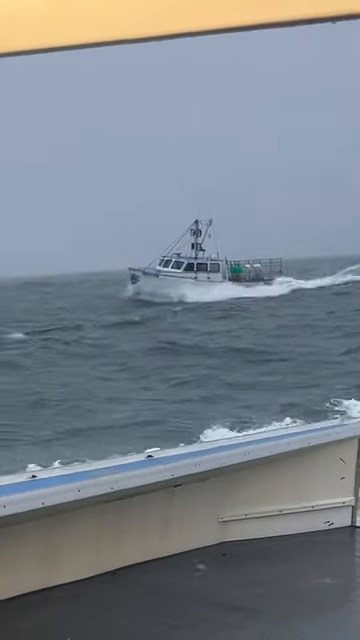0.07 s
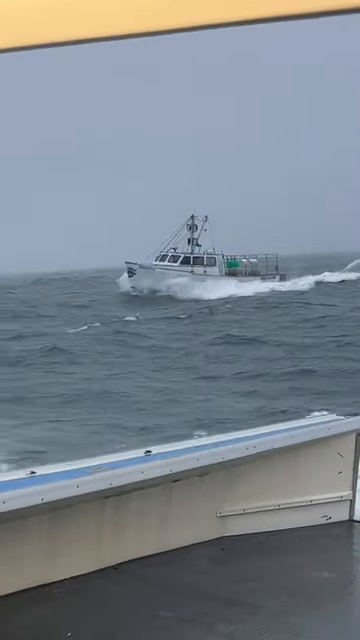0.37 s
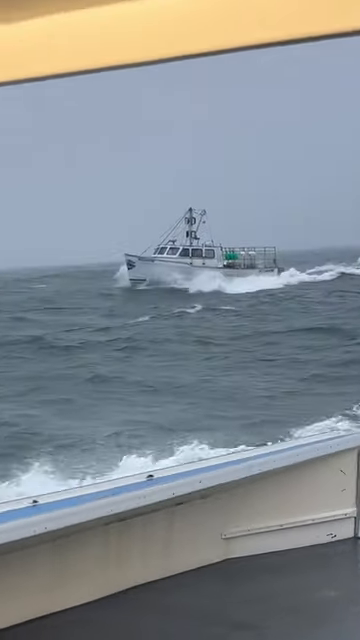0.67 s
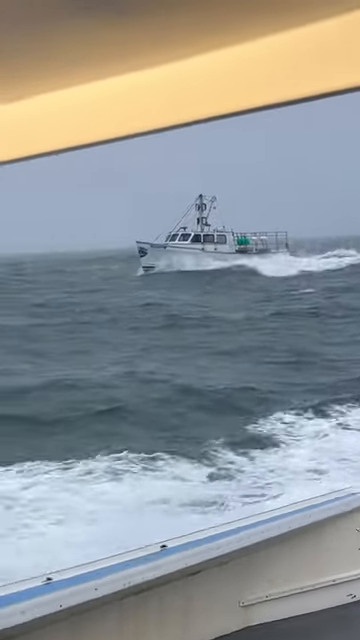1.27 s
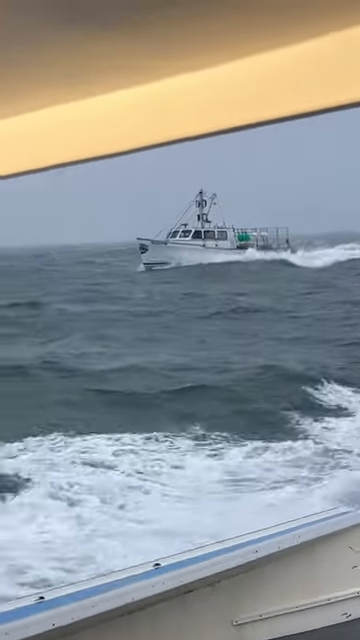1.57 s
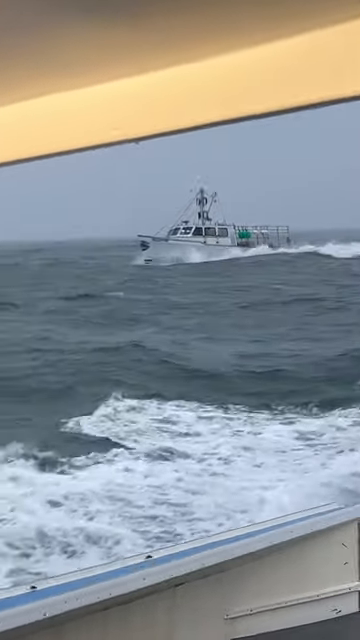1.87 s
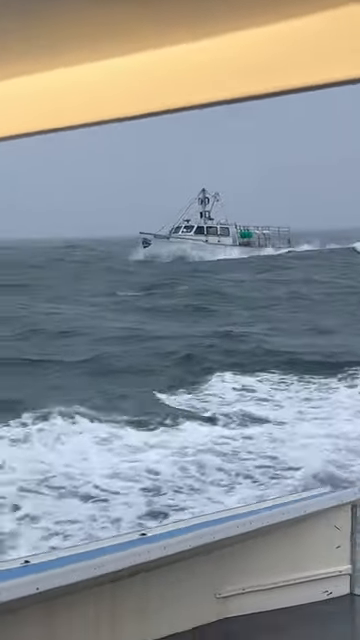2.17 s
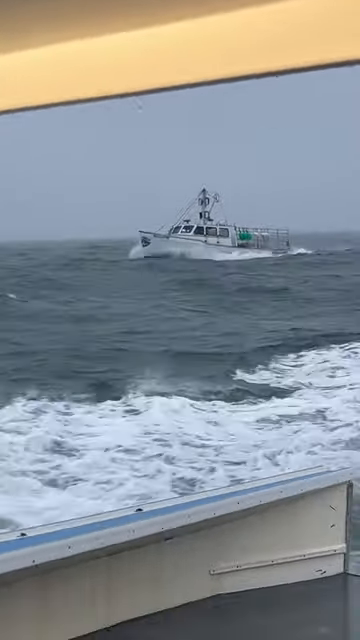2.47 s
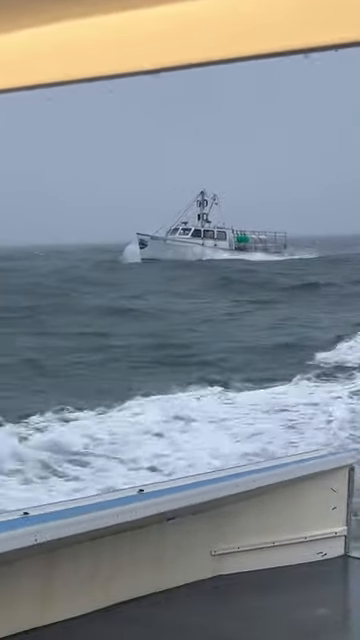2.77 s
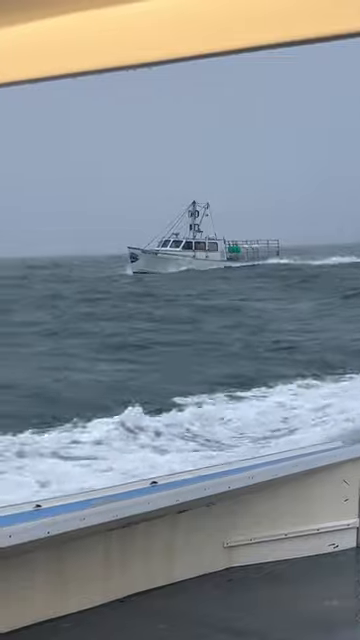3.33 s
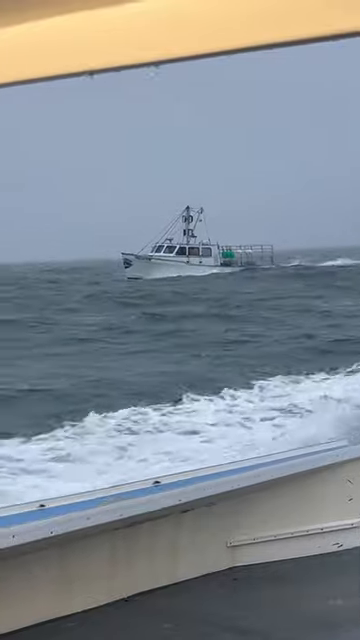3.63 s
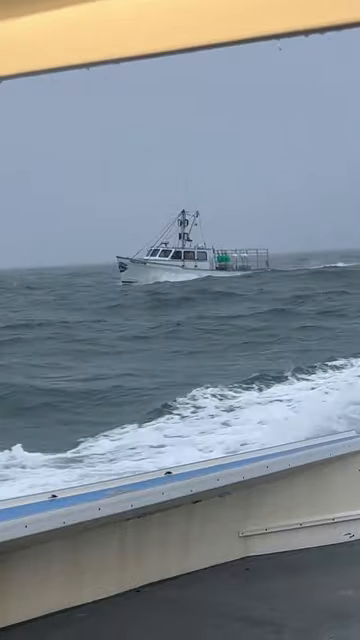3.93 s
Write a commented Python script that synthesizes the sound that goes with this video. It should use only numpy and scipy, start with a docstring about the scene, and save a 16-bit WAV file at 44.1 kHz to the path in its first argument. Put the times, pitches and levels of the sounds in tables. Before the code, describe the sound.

A low, chugging diesel engine holds its speed, close by on the deck of a boat at sea. Churning water swells twice under a spray hiss, bringing a few hull thumps and slaps, with light wind on the microphone.

```python
"""On the open deck of a boat cruising through a choppy sea.
A six-cylinder diesel holds steady revs: its firings make an exhaust drone, with a loping knock,
a buzzing block, combustion clatter and two thin turbo whistles on top. The wake surges along the
hull under a hiss of spray, a few waves thump and slap it, and gusts brush the microphone."""
import sys
import numpy as np
from scipy import signal
from scipy.fft import rfft, irfft
from scipy.io import wavfile
from scipy.ndimage import uniform_filter1d, minimum_filter1d

SR = 44100
rng = np.random.default_rng(int(sys.argv[2]) if len(sys.argv) > 2 else 0)


def transcribe(signal):
    """Save signal, clipped to [-1, 1], as a 16-bit WAV file at the path in sys.argv[1]."""
    frames = np.atleast_2d(signal).T
    limited = np.clip(frames, -1, 1)
    pcm = np.round(limited * 32767).astype(np.int16)
    wavfile.write(sys.argv[1], SR, pcm)


N = 176400
TIME = np.arange(N) / SR
CYCLE_HZ, CYLINDERS = 13.02, 6  # an order is a multiple of the engine's cycle rate

# low harmonics of the exhaust: order, level_db
EXHAUST_ORDERS = [(3, -39), (4, -31), (5, -22), (6, 0), (7, -16), (8, -26), (9, -14.5), (10, -25),
                  (11, -20), (12, -11.5)]
# harmonics that the hull and cabin reinforce: order, level_db
HULL_ORDERS = [(14, -23.5), (15, -21), (18, -32), (21, -27.5), (27, -30.5), (30, -25.5), (39, -31.5),
               (48, -42.5), (52, -34), (56, -41), (94, -44), (107, -45.5)]
# colour of rushing air, also used to widen the wake: freq_hz, level_db
RUSH_SPECTRUM = [(20, -26.5), (45, -10.5), (80, 0), (130, 5), (320, 6.5), (650, 4), (1100, -3), (1600, -19),
                 (2200, -64.5), (4000, -100)]


def amp(db):
    """Decibels to gain."""
    return 10 ** (np.asarray(db) / 20)


def unit(x):
    """Scales to rms 1."""
    return x / np.sqrt(np.mean(x ** 2) + 1e-20)


def curve(points):
    """A control curve at every sample."""
    return np.interp(TIME, *np.transpose(points))


def level_at(spectrum, hz):
    """Reads a spectrum table on a log-frequency axis."""
    freq_hz, level_db = np.transpose(spectrum)
    return np.interp(np.log(hz + 1), np.log(freq_hz + 1), level_db)


def colour(x, spectrum):
    """Filters by a spectrum table and scales to rms 1."""
    return unit(irfft(rfft(x) * amp(level_at(spectrum, np.fft.rfftfreq(N, 1 / SR))), N))


def noise(spectrum):
    """Noise of rms 1 with the given colour."""
    return colour(rng.standard_normal(N), spectrum)


def drift(rate_hz, size=2048):
    """Smooth random motion of rms 1, up to about the given rate."""
    hz = np.fft.rfftfreq(size, N / SR / size)
    slow = irfft(rfft(rng.standard_normal(size)) * np.exp(-.5 * (hz / rate_hz) ** 2) * (hz > 0), size)
    return np.interp(TIME, np.linspace(0, N / SR, size), unit(slow))


def stereo(centre, sides):
    """Left and right from centre and side parts."""
    return np.array([centre + sides, centre - sides])


def quarter_turn(x):
    """Shifts every frequency a quarter cycle, like the difference between two close microphone ports."""
    return irfft(-1j * rfft(x), N)


def add(mix, start_s, sound):
    """Mixes a sound in at its start time."""
    part = mix[max(round(start_s * SR), 0):][:len(sound)]
    part += sound[:len(part)]


def churn(spectrum, lumps_db):
    """Turbulent water or air: every band comes in quick lumps of its own."""
    # borders of the bands that churn independently: edge_hz
    edges = [0, 110, 330, 750, 1600, 20000]
    bins, hz = rfft(noise(spectrum)), np.fft.rfftfreq(N, 1 / SR)
    bands = [irfft(bins * (hz >= lo) * (hz < hi), N) for lo, hi in zip(edges, edges[1:])]
    return unit(sum(band * amp(lumps_db * 2 * np.tanh(drift(rate_hz=62) / 2)) for band in bands))


def partial(order, cycle_angle, waver):
    """One wavering engine harmonic. The exhaust smears the low orders' phases; high ones fall at random."""
    offset = 2 * np.pi * rng.random()
    if order <= EXHAUST_ORDERS[-1][0]:
        offset = 2.4 * (order - CYLINDERS) ** 2  # dispersion around the firing tone
    level = np.sqrt(2) * (1 + waver * drift(rate_hz=16.5))
    return level * np.cos(order * cycle_angle + offset + waver * drift(rate_hz=4.1))


def spray():
    """An even spray hiss, with treble notches and a phasey width from the stereo recorder."""
    # centre spectrum, with the recorder's notch at 5 kHz: freq_hz, level_db
    centre_spectrum = [(20, 17.5), (45, 19.5), (200, 9.5), (1000, 4), (2300, 7.5), (3400, 6), (4000, 1.5),
                       (4800, -0.5), (5000, -13.5), (5250, 0), (8600, 0.5), (9700, -4.5), (11200, -8),
                       (12300, -21.5), (13000, -49.5)]
    # side spectrum, with holes from the recorder's coding and stereo processing: freq_hz, level_db
    side_spectrum = [(2200, -39.5), (4000, -23), (4500, -2.5), (5000, 11.5), (5600, -4.5), (6500, -29),
                     (7700, 0), (9000, 7.5), (9800, 2.5), (11000, 5), (12500, 0), (15700, 0.5)]
    # slow swell of the spray: time_s, gain_db
    swell = [(0, 1.7), (.45, 1), (1.1, -0.7), (1.6, 0.6), (2.1, 1.2), (2.9, -0.4), (4, 0.5)]
    hiss, diffuse = rng.standard_normal((2, N))
    likeness = .75  # how closely the sides follow the centre
    side_hiss = likeness * quarter_turn(hiss) + np.sqrt(1 - likeness ** 2) * diffuse
    centre = amp(-45.5) * colour(hiss, centre_spectrum)
    sides = amp(-55) * colour(side_hiss, side_spectrum)
    return amp(curve(swell)) * stereo(centre, sides)


def wind():
    """Gusts flutter differently at the two sides of the microphone."""
    # airflow over the microphone: time_s, level_db
    gusts = [(0, -38), (.2, -28), (.45, -31), (.62, -43), (.8, -41.5), (1, -34.5), (1.2, -43.5),
             (1.36, -35), (1.52, -46), (1.75, -26), (2.05, -35), (2.22, -42.5), (2.8, -40.5), (3.3, -39.5),
             (4, -46)]
    centre = amp(-13) * churn(RUSH_SPECTRUM, lumps_db=.5)
    sides = amp(-.5) * churn(RUSH_SPECTRUM, lumps_db=.5)
    return amp(curve(gusts)) * stereo(centre, sides)


def wake():
    """Lumpy roar of churning water, swelling as the hull meets the waves."""
    # surge along the hull: time_s, level_db
    surge = [(0, -62), (.5, -32), (1.2, -30.5), (1.4, -20), (1.62, -23), (1.79, -17.5), (1.95, -21.5),
             (2.2, -25), (2.6, -39), (2.9, -26), (3.1, -25), (3.45, -21.5), (3.8, -20), (4, -22.5)]
    # colour of the roar: freq_hz, level_db
    roar = [(15, -27.5), (30, -19.5), (48, 10.5), (110, -3.5), (180, 1), (260, -2.5), (500, -8),
            (800, -18.5), (1300, -28), (2200, -35), (4000, -62.5), (9000, -76), (13000, -100)]
    return amp(curve(surge)) * stereo(churn(roar, lumps_db=4.5), amp(-22) * noise(RUSH_SPECTRUM))


def wave_thumps():
    """Waves hit the hull with soft, short booms."""
    # blows on the hull: start_s, level_db, pitch_hz, length_s
    thumps = [(1.425, -17, 260, .022), (1.672, -14, 150, .026), (1.718, -13, 115, .04),
              (1.763, -4.5, 178, .03), (1.9, -8, 120, .032), (3.338, -11, 110, .042),
              (3.524, -11, 140, .026), (3.745, -11, 165, .018)]
    out = np.zeros(N)
    for start_s, level_db, pitch_hz, length_s in thumps:
        t = np.arange(0, length_s, 1 / SR)
        envelope = np.sin(np.pi * t / length_s) ** 2
        add(out, start_s, amp(level_db) * envelope * np.sin(2 * np.pi * (pitch_hz * t + rng.random())))
    return out


def wave_slaps():
    """Water smacks the hull: a sharp crack with a splash tail and a ringing panel."""
    # slaps of water: start_s, level_db, tilt_db_per_octave
    slaps = [(1.3795, -14, -2), (1.436, -20, -4), (1.8126, -6, 0), (1.8395, -23, 0), (3.155, -21, -3),
             (3.455, -22, -3), (3.4875, -16, -4), (3.752, -19, -5)]
    # colour of a slap before its tilt: freq_hz, level_db
    slap_spectrum = [(100, 2), (550, 7), (1000, 2), (2000, -6), (3500, -16), (6000, -33), (8000, -55),
                     (12000, -100)]
    # modes of the hull panel: pitch_hz, level_db, decay_s
    panel = [(382, -15, .012), (560, -10.5, .009), (1227, -28, .014)]
    rise_s, crack_decay_s, splash_decay_s = .0008, .0015, .024
    crack_and_tail = np.exp(-TIME / crack_decay_s) + amp(-19) * np.exp(-TIME / splash_decay_s)
    envelope = np.minimum(TIME / rise_s, 1) * crack_and_tail
    ring = sum(amp(db) * np.exp(-TIME / decay) * np.sin(2 * np.pi * hz * TIME) for hz, db, decay in panel)
    out = np.zeros(N)
    for start_s, level_db, tilt in slaps:
        splash = noise([(hz, db + tilt * np.log2(hz)) for hz, db in slap_spectrum])
        add(out, start_s, amp(level_db) * (envelope * splash + ring))
    return out


def turbos():
    """Two turbochargers whistle as narrow bands of noise, climbing slowly together."""
    # whistle rising with boost: time_s, pitch_hz
    glide = [(0, 8670), (1, 8810), (2, 8760), (3, 8950), (4, 8960)]
    # the two turbochargers: pitch_ratio, level_db
    chargers = [(1, -62), (1.033, -64.5)]
    # swell of both whistles: time_s, gain_db
    swell = [(0, 2.5), (.8, 0.5), (1.25, 5), (1.7, 1), (2.2, 6), (2.55, 3), (3.3, 4.5), (4, 0.5)]
    width_hz = 55
    out = np.zeros((2, N))
    for pitch_ratio, level_db in chargers:
        phase = 2 * np.pi * np.cumsum(pitch_ratio * curve(glide)) / SR
        whistle = drift(width_hz / 2) * np.cos(phase) + drift(width_hz / 2) * np.sin(phase)
        out += amp(level_db + curve(swell)) * stereo(whistle, .6 * quarter_turn(whistle))
    return out


def block_buzz(cycle_angle, count=140, scatter_db=5):
    """The engine block radiates uneven high harmonics above the exhaust's, between the hull's."""
    # contour of the buzz: freq_hz, level_db per harmonic
    contour = [(200, -45.5), (420, -59), (600, -62), (820, -64.5), (950, -58), (1100, -60), (1250, -67),
               (1400, -67), (1800, -72.5), (2400, -68.5)]
    orders = np.setdiff1d(EXHAUST_ORDERS[-1][0] + 1 + np.arange(count), [round(k) for k, _ in HULL_ORDERS])
    out = np.zeros(N)
    for order in orders:
        level_db = level_at(contour, order * CYCLE_HZ) + scatter_db * rng.standard_normal()
        out += amp(level_db) * partial(order, cycle_angle, waver=.32)
    return out


def clatter(cycle_angle):
    """Combustion noise pulses with the firings, every other one stronger, and with the whole cycle."""
    # colour of the clatter: freq_hz, level_db
    spectrum = [(30, -14.5), (50, 1), (90, 10), (140, 10), (185, 2), (250, -5.5), (400, -7.5), (520, -4.5),
                (780, -12), (1000, -9.5), (1500, -26), (2500, -22.5), (4000, -48.5), (8000, -65),
                (13000, -100)]
    firing_angle = CYLINDERS * cycle_angle
    pulse = np.exp(.11 * np.cos(firing_angle) + .16 * np.cos(firing_angle / 2) + .2 * np.cos(cycle_angle))
    return amp(-28.5) * unit(pulse * noise(spectrum))


def knocks(cycle_angle):
    """Diesel knock, a tick and then a hollow thud; two strong and one weak per cycle make the chug."""
    # the loping pattern: place_in_cycle (0-1), thud_db, tick_db
    pattern = [(0, -17.5, -34), (.333, -17.5, -35), (.655, -31, -32)]
    # how hard the engine knocks: time_s, gain_db
    force = [(0, -3.5), (1, -2.5), (1.5, -1), (2.4, -1.6), (4, -1.5)]
    thud_hz, thud_width_s = 385, .0018
    tick_hz, tick_width_s, tick_lead_s = 986, .00091, .0018
    scatter_db, detune = 1.3, .07
    out, t = np.zeros(N), np.arange(-.01, .01, 1 / SR)
    thud_shape = np.exp(-.5 * (t / thud_width_s) ** 2)
    tick_shape = np.exp(-.5 * ((t + tick_lead_s) / tick_width_s) ** 2)
    cycles = cycle_angle / (2 * np.pi)
    for place, thud_db, tick_db in pattern:
        for peak_s in np.interp(np.arange(place, cycles[-1], 1), cycles, TIME):
            thud_jitter, pitch_jitter, tick_jitter, tick_phase = rng.standard_normal(4)
            thud = thud_shape * np.cos(2 * np.pi * thud_hz * (1 + detune * pitch_jitter) * t)
            thud *= amp(thud_db + scatter_db * thud_jitter)
            tick = tick_shape * np.cos(2 * np.pi * tick_hz * t + tick_phase)
            tick *= amp(tick_db + scatter_db * tick_jitter)
            add(out, peak_s + t[0], thud + tick)
    return amp(curve(force)) * out


def drone(cycle_angle):
    """The firing tone, with weaker, less steady harmonics from unequal cylinders and the ringing hull."""
    # engine load: time_s, gain_db
    load = [(0, -10.5), (.8, -13), (1.3, -10.5), (2.2, -10), (3, -11), (4, -10.5)]
    out = np.zeros(N)
    for order, level_db in list(EXHAUST_ORDERS) + list(HULL_ORDERS):
        waver = .1 if round(order) == CYLINDERS else .22
        out += amp(level_db) * partial(round(order), cycle_angle, waver)
    return amp(curve(load)) * out


def scene():
    """The engine in the centre, water and wind around it."""
    cycle_hz = CYCLE_HZ * (1 + .000776 * drift(rate_hz=.696))
    cycle_angle = 2 * np.pi * np.cumsum(cycle_hz) / SR
    engine = drone(cycle_angle) + knocks(cycle_angle) + block_buzz(cycle_angle) + clatter(cycle_angle)
    return engine + wave_thumps() + wave_slaps() + turbos() + wake() + spray() + wind()


def record(dry):
    """The microphone's low cut, a smooth peak limiter, then a steep treble cut."""
    low_cut_hz, ceiling, high_cut_hz = 36, .92, 15800
    dry = signal.sosfilt(signal.butter(4, low_cut_hz, "highpass", fs=SR, output="sos"), dry)
    gain = minimum_filter1d(np.minimum(1, ceiling / (abs(dry).max(0) + 1e-9)), size=801)
    limited = dry * uniform_filter1d(uniform_filter1d(gain, size=401), size=401)
    lowpass = signal.firwin(511, high_cut_hz, window=("kaiser", 9), fs=SR)
    return signal.oaconvolve(limited, lowpass[None], "same")


dry = scene()
out = record(dry)
transcribe(out)
```